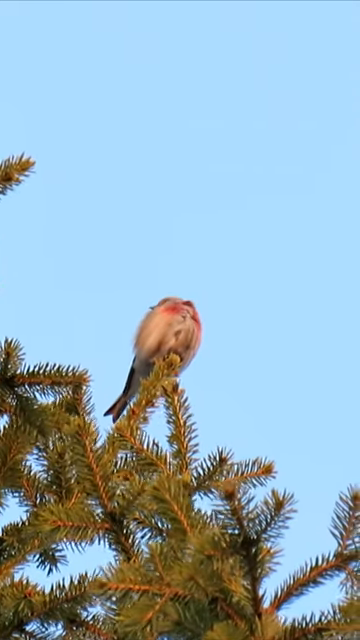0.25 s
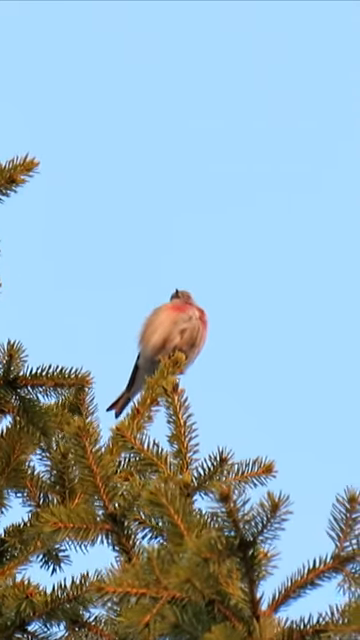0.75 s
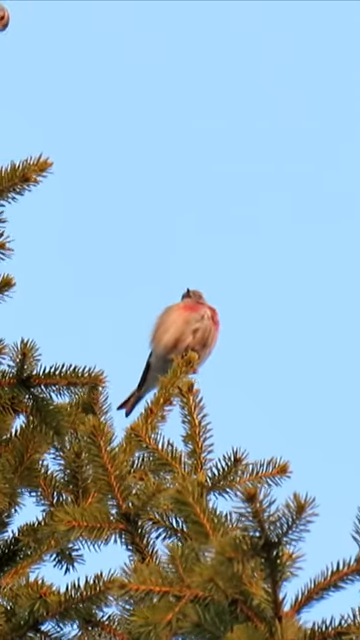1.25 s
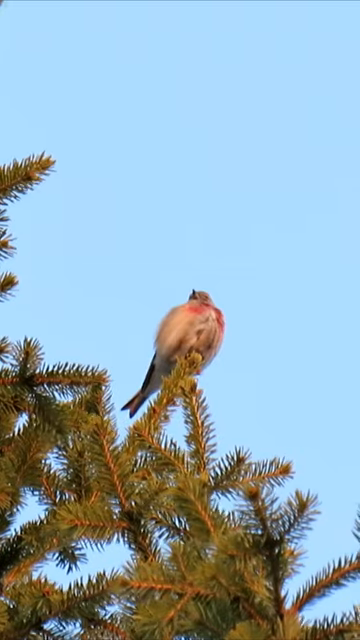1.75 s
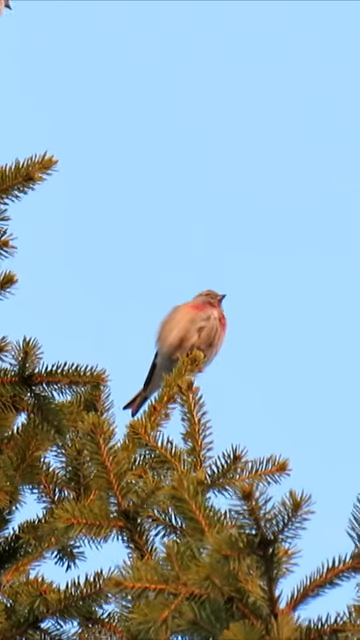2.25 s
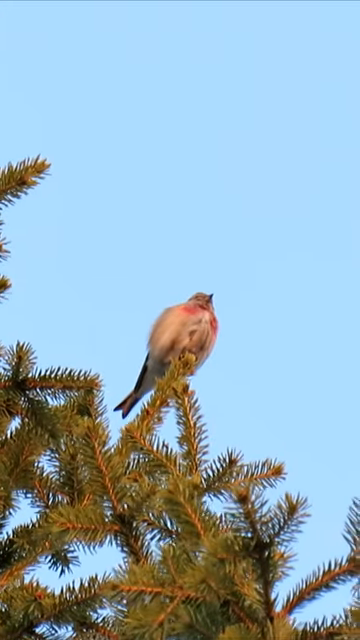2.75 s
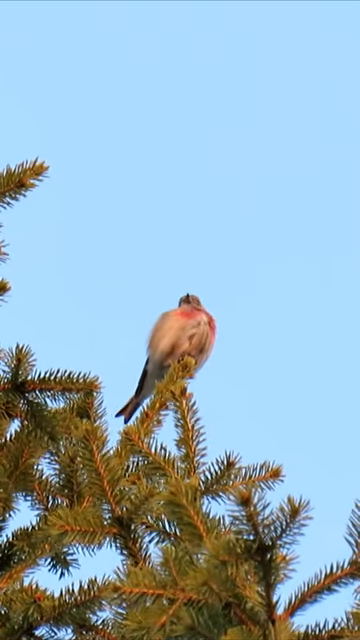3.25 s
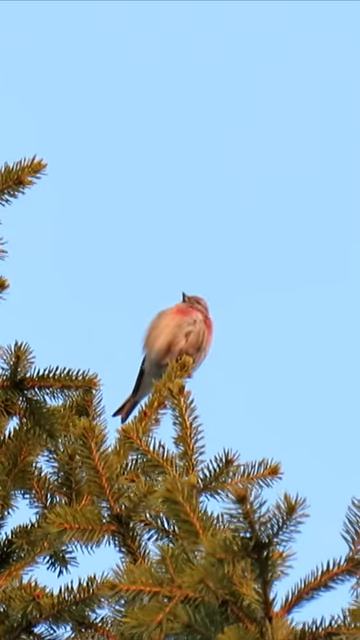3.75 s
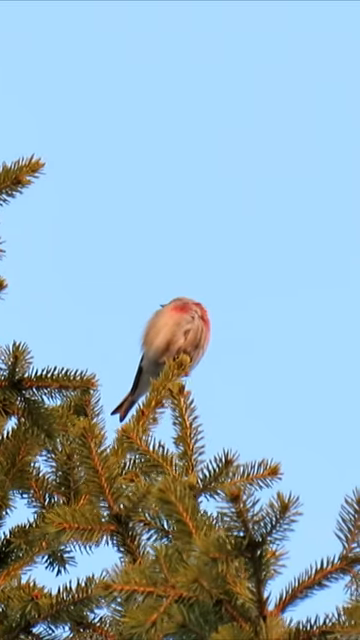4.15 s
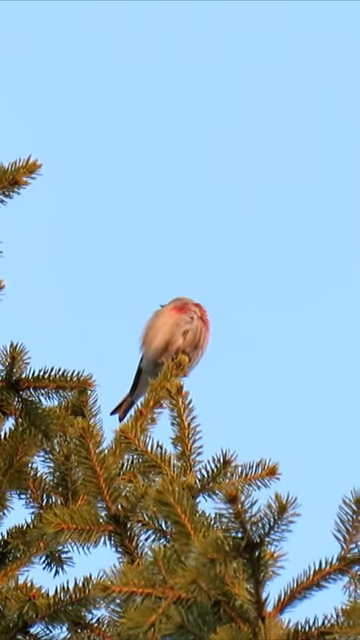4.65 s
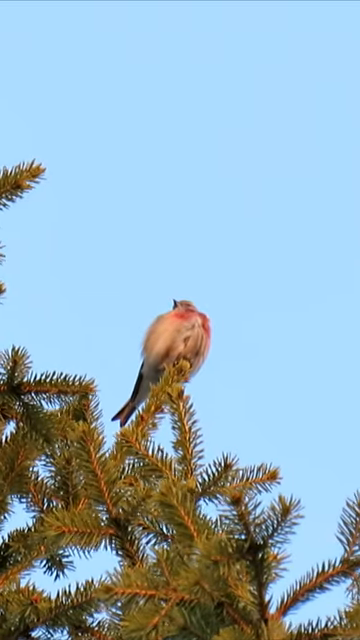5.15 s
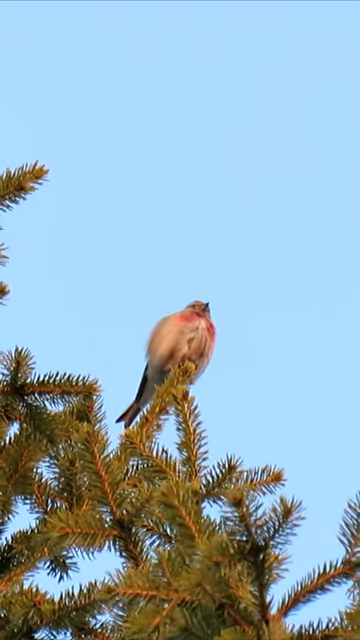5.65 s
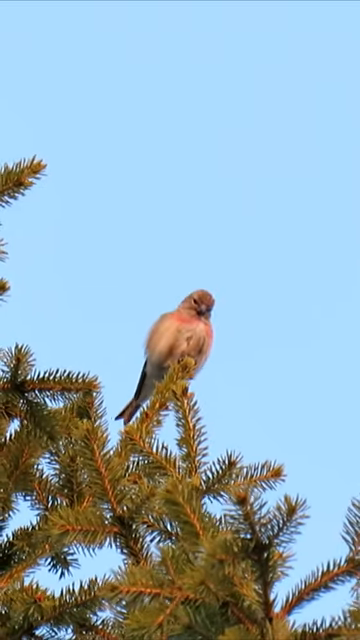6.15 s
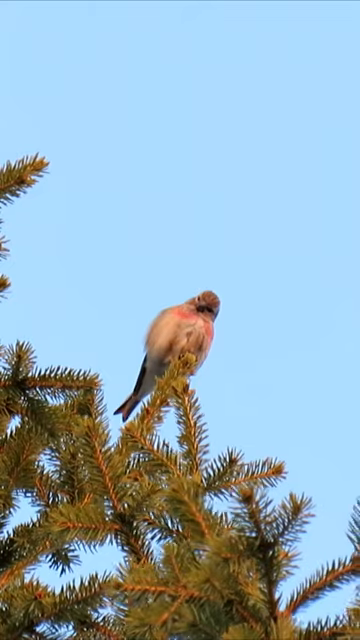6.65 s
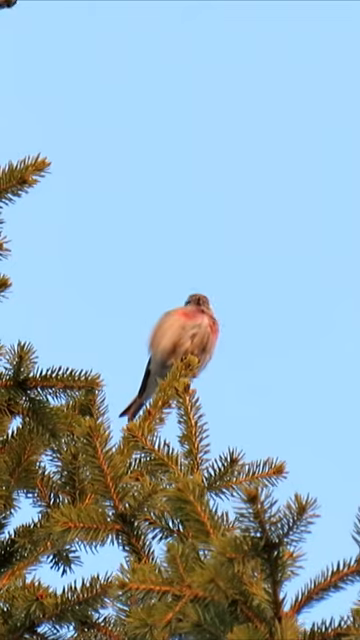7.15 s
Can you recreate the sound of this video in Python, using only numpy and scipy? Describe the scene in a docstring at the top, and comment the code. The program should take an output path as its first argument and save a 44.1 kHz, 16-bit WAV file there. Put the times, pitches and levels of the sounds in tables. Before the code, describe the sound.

Fast twittering, gliding whistles and reedy notes from one small bird outdoors, with a faint distant engine behind it.

```python
"""Sharp chips ring out over a soft outdoor rush: a linnet sings from the top of a spruce, going on to
whistles, buzzes, reedy arches and nasal notes. Source and filter: each note is one gliding tone of the
syrinx, its overtones shaped by throat and beak; twigs and trees scatter a faint echo.
Midway a far engine starts to drone and a few dry ticks begin; the rush swells at the end."""
import sys
import numpy as np
from scipy import signal
from scipy.fft import rfft, irfft, next_fast_len
from scipy.io import wavfile
from scipy.ndimage import uniform_filter1d, map_coordinates

SR = 44100
rng = np.random.default_rng(int(sys.argv[2]) if len(sys.argv) > 2 else 0)


def transcribe(u):
    """Save the signal u as a 16-bit wav file named by the first command-line argument.

    u: samples, shape (n,) or (channels, n), limited to [-1, 1]; the rate is SR.
    q: integer samples, one column per channel.
    """
    v = np.clip(np.atleast_2d(u).T, -1, 1)
    q = np.round(v * 32767).astype(np.int16)
    wavfile.write(sys.argv[1], SR, q)


N = 326781


def amp(db):
    return 10 ** (np.asarray(db) / 20)


def unit(x):
    return x / np.sqrt(np.mean(x ** 2) + 1e-20)


def along(points, hz):
    """Interpolation of (f/Hz, value) points on a logarithmic frequency axis."""
    f, v = np.transpose(points)
    return np.interp(np.log(np.abs(hz) + 1), np.log(f + 1), v)


def curves(rows, t):
    """Linear interpolation in time of each column after the first."""
    s, *cols = np.transpose(rows)
    return [np.interp(t, s, c) for c in cols]


def span(start, end):
    """Sample indices and times of an interval."""
    i = np.arange(max(int(start * SR), 0), min(int(end * SR), N))
    return i, i / SR


def wobble(rate, size):
    """Smooth random modulation: a spline through rate knots a second."""
    return map_coordinates(rng.standard_normal(int(size * rate / SR) + 4), [np.arange(size) * rate / SR])


def filtered(x, response):
    """Linear filtering: the spectrum is multiplied by a frequency response."""
    m = next_fast_len(N + SR // 2)
    return irfft(rfft(x, m) * response(np.fft.rfftfreq(m, 1 / SR)), m)[..., :N]


def gate(t, start, end, ramp):
    """A window with raised-cosine edges."""
    return np.sin(np.pi / 2 * np.clip(np.minimum(t - start, end - t) / ramp + .5, 0, 1)) ** 2


# Response of throat and beak: f/Hz, gain/dB
BEAK_RESPONSE = [(1500, -9.5), (2300, 0), (3300, 0.5), (6000, 0.5), (7500, -12), (10000, -15.5),
                 (15000, -28)]

def syrinx(hz, partials, jitter, shimmer_db):
    """Source and filter: partials of an unsteady tone slide through the pass band of throat and beak."""
    hz = hz * (1 + jitter * wobble(609, len(hz)))
    phase = 2 * np.pi * np.cumsum(hz) / SR
    tone = sum(amp(db + along(BEAK_RESPONSE, k * hz)) * np.sin(k * phase) * (k * hz < SR / 2)
               for k, db in partials)
    return tone * amp(shimmer_db * wobble(323.8, len(hz)))


def rasp(hz, depth):
    """Noise modulation: air rushing through the syrinx spreads sidebands around a tone."""
    return 1 + depth * wobble(3500, len(hz))


def chirp(apex, top_hz, rise, fall, sag, roundness, levels, doubling_db, edge, jitter, rasp_db):
    """Joint modulation: pitch and level arch together; period doubling adds half-order partials."""
    out = np.zeros(N)
    i, t = span(apex - 2 * rise, apex + 2 * fall)
    rising = t < apex
    u = np.abs((t - apex) / np.where(rising, rise, fall))  # distance from the apex
    bend = roundness * np.where(rising, 2, 1) + rising + 1e-3  # the climb starts steeply and rounds off
    drop = np.where(rising, .33, sag)
    hz = top_hz * (1 - drop * u * u * (1 + bend) / (u * u + bend))
    envelope = np.exp(-edge * u ** np.where(rising, 2.6, 3))
    # roughness and period doubling are strongest early in the climb
    roughness = amp(rasp_db) + amp(-16) * u * rising
    half_order_db = doubling_db - 7 * (1 - np.minimum(u, 1) * rising)
    partials = list(enumerate(levels, 1)) + [(1.5, half_order_db), (2.5, half_order_db)]
    out[i] = envelope * rasp(hz, roughness) * syrinx(hz, partials, jitter, shimmer_db=1.1)
    return out


# Sharp chips: apex t/s, top f/Hz, fall time/s, share of pitch lost, level/dB, octave lift/dB
CHIPS = [(0.0, 2250, 0.025, 0.25, -40, -9.5), (0.1246, 2270, 0.023, .18, -45.5, -2.5),
         (0.243, 2450, 0.023, 0.22, -49.5, -1.5), (0.39, 2440, .024, 0.26, -52, -2.5),
         (0.5945, 2324, 0.0093, 0.21, -41.5, -0.5), (0.733, 2470, 0.015, 0.37, -40, 0.5),
         (0.8855, 2630, 0.019, 0.42, -34.5, 5), (1.068, 2480, 0.012, 0.34, -34.5, 8.5),
         (1.2153, 2950, 0.028, 0.19, -38, -11), (1.783, 2515, 0.019, .35, -34, 5),
         (1.908, 2690, 0.026, 0.28, -35.5, 5), (2.157, 2840, 0.011, 0.14, -37.5, 11),
         (2.3111, 2960, 0.021, 0.2, -38, 15), (2.4344, 2066, 0.012, 0.21, -36, 15.5),
         (2.5618, 2333, 0.013, .28, -36, 12), (2.669, 2220, 0.014, .26, -36, 8.5),
         (6.1992, 2440, 0.014, .28, -36.5, 1), (6.408, 3120, .024, 0.33, -28.5, -4.5),
         (6.513, 2407, 0.018, .35, -28.5, 2.5), (7.153, 2660, 0.017, 0.35, -40, 1),
         (7.213, 2786, 0.017, .42, -39.5, 0.5), (7.274, 2630, 0.012, 0.33, -38, 2),
         (7.339, 2766, 0.015, 0.33, -40.5, 3.5), (7.4093, 2710, .01, 0.25, -41.5, 3)]

def chips():
    """Frequency sweep: a flick up and a slide down, the higher overtones in step with the octave."""
    out = np.zeros(N)
    for apex, top_hz, fall, sag, db, lift_db in CHIPS:
        octave_db = db + lift_db
        levels = [db - 1.5, octave_db, octave_db - 14, octave_db - 22, octave_db - 30]
        out += chirp(apex, top_hz, rise=.008, fall=fall, sag=sag, roundness=.13, levels=levels,
                     doubling_db=octave_db - 22, edge=1.78, jitter=.012, rasp_db=-26.5)
    return out


def twigs(x, t60=.04):
    """Early reflections: branches close to the bird smear each note a little."""
    t = np.arange(SR // 10) / SR
    tail = rng.standard_normal(len(t)) * amp(-60 * t / t60)
    return signal.fftconvolve(x, tail / np.linalg.norm(tail))[:N]


# Reverberation time of the trees: f/Hz, T60/s
TREE_DECAY = [(1500, 0.29), (4000, 0.11), (10000, 0.22)]

def tree_echo(x, delay_s=.0074):
    """Reverberation: scatter from the trees leaves a thin tail that dies fastest near 4 kHz."""
    hz, t, spectra = signal.stft(rng.standard_normal(SR // 2), SR, nperseg=256)
    decay = amp(-60 * t / along(TREE_DECAY, hz)[:, None])
    tail = signal.istft(spectra * decay, SR, nperseg=256)[1]
    response = np.pad(tail / np.linalg.norm(tail), (int(delay_s * SR), 0))
    return signal.fftconvolve(x, response)[:N]


# Likeness of left and right in the background: f/Hz, correlation
COHERENCE = [(60, 0.98), (130, 0.93), (290, 0.54), (640, 0.96), (1410, 0.96), (3100, 0.93), (6820, 1),
             (15000, 0.99)]

def air(spectrum, patchy_db):
    """Partial coherence: coloured stereo noise of rms 1, its gain patchy in time and frequency."""
    spectra = signal.stft(rng.standard_normal((2, N)), nperseg=512)[2]
    patches = uniform_filter1d(rng.standard_normal(spectra.shape[1:]), size=5, axis=0)
    patches = uniform_filter1d(patches, size=16, axis=1)
    pair = signal.istft(spectra * amp(patchy_db * unit(patches)), nperseg=512)[1][:, :N]

    def mid_side_response(hz):
        angle = np.arccos(np.clip(along(COHERENCE, hz), -1, 1)) / 2
        return amp(along(spectrum, hz)) * [np.cos(angle), np.sin(angle)]

    mid, side = filtered(pair, mid_side_response)
    return unit(np.array([mid + side, mid - side]))


# Envelopes of the background: t/s, level/dB
RUSH_LEVEL = [(0.0, -53.5), (0.1, -53), (1.53, -56), (2.15, -52.5), (2.77, -57), (4.31, -52.5), (6.31, -54),
              (7.08, -47), (7.41, -46)]
HISS_LEVEL = [(0, -63), (.41, -70), (.44, -76), (.56, -75), (.58, -63.5), (7.41, -63.5)]
# Spectral densities of the background: f/Hz, relative level/dB
RUSH_SPECTRUM = [(150, -11), (300, -1.5), (450, 0.5), (700, -1), (1150, 2), (1600, -3.5), (2200, -9),
                 (3500, -16), (9000, -69.5)]
HISS_SPECTRUM = [(900, -27), (1800, 4.5), (3000, 0.5), (5000, 5.5), (8000, -3.5), (11000, -6), (15800, -27)]
RUMBLE_SPECTRUM = [(15, -23), (30, 2.5), (42, 1), (62, 4.5), (100, -1.5), (155, 3), (190, -1.5), (228, 5),
                   (270, -3), (500, -27.5)]

def outdoors(rumble_db=-59):
    """Incoherent sum of noises: a distant rush, a fine hiss that dips briefly and a low rumble."""
    t = np.arange(N) / SR
    rush = amp(curves(RUSH_LEVEL, t)[0]) * air(RUSH_SPECTRUM, patchy_db=1.5)
    hiss = amp(curves(HISS_LEVEL, t)[0]) * air(HISS_SPECTRUM, patchy_db=.7)
    rumble = amp(rumble_db) * air(RUMBLE_SPECTRUM, patchy_db=-2)
    return rush + hiss + rumble


def whistled(hz, harmonics, jitter, shimmer_db):
    """Sustained oscillation of the syrinx, with a trace of air noise."""
    return syrinx(hz, harmonics, jitter, shimmer_db) * rasp(hz, amp(-33))


def held_notes(notes, harmonics, jitter, shimmer_db, swell_db=14, firm_db=-36, ramp=.0034):
    """Glide and sustain: a note swells onto its pitch, then drifts; weakly blown ones waver more."""
    out = np.zeros(N)
    for start, length, glide, first_hz, held_hz, last_hz, held_db, fade_db in notes:
        i, t = span(start - ramp, start + length + ramp)
        approach = np.clip(1 - (t - start) / glide, 0, 1)
        drift = np.interp(t, [start + glide, start + length], [0, 1])
        hz = held_hz + (first_hz - held_hz) * approach ** 1.6 + (last_hz - held_hz) * drift
        db = held_db - swell_db * approach ** 2.7 - fade_db * drift
        waver = .5 + .081 * np.maximum(firm_db - db, 0)
        tone = whistled(hz, harmonics, jitter * waver, shimmer_db * waver)
        out[i] += amp(db) * gate(t, start, start + length, ramp) * tone
    return out


# Pure whistles: t/s, length/s, glide time/s, first f/Hz, held f/Hz, last f/Hz, level/dB, fade/dB
WHISTLES = [(0.625, 0.097, 0.043, 5100, 5370, 5250, -48, -3),
            (0.72, 0.072, 0.044, 5380, 5440, 5360, -48.5, -4),
            (0.781, 0.069, .022, 5450, 4650, 3540, -44, 20), (0.93, 0.1, 0.051, 2650, 2620, 2500, -61, -3),
            (1.204, 0.0143, 0.012, 3210, 3470, 3080, -31.5, 11),
            (1.42, .24, 0.18, 4300, 4400, 4360, -53.5, 16), (1.4954, 0.16, 0.056, 3080, 3305, 3377, -28, 4),
            (1.829, 0.078, 0.047, 4614, 3970, 3500, -53.5, -5),
            (2.731, 0.14, 0.072, 4120, 3304, 3375, -30, 20),
            (2.875, 0.14, 0.052, 3250, 2440, 2430, -50.5, 5.5),
            (3.028, 0.01, 0.0035, 4900, 4800, 3980, -53, 9), (4.56, 0.043, 0.02, 3550, 3150, 2300, -32, 6),
            (4.749, 0.031, .012, 3100, 2820, 2390, -35.5, 3),
            (5.631, 0.039, 0.0035, 5400, 5270, 4270, -43, 11),
            (5.77, 0.12, 0.037, 3980, 3910, 4050, -46, 0), (5.895, 0.058, 0.049, 4150, 3250, 2840, -36, 17),
            (5.95, 0.18, 0.014, 3020, 2980, 3230, -50, 8), (6.065, 0.22, .016, 6750, 4370, 4460, -41.5, 14),
            (6.07, 0.23, 0.055, 2220, 2204, 2350, -54, 10), (6.27, .12, .06, 2350, 2560, 2950, -59.5, -6),
            (6.752, 0.31, 0.038, 3450, 3003, 2940, -40, 19),
            (6.932, 0.035, 0.023, 5560, 5420, 7060, -47, 1)]
# Their source spectrum: harmonic number, relative level/dB
WHISTLE_HARMONICS = [(1, 0.5), (2, -25.5), (3, -28.5)]

def whistles():
    """Nearly sinusoidal oscillation: either side of the syrinx sounds a tone with faint overtones."""
    return held_notes(WHISTLES, WHISTLE_HARMONICS, jitter=.0049, shimmer_db=1.1)


# Loud hooked whistles: t/s, length/s, f/Hz after the dive, last f/Hz,
# overshoot and quiver as shares of pitch, level/dB, fade/dB
HOOKS = [(1.185, 0.0195, 3810, 3310, 0, 0, -21.5, 15), (4.4834, 0.069, 3906, 3364, .02, 0.016, -15.5, 21),
         (4.6536, 0.067, 3634, 3500, .02, 0.064, -16, 23),
         (5.181, 0.055, 4140, 6300, 0.089, 0.012, -25, 3.1), (5.296, .061, 4135, 5610, 0.11, .01, -23, 3.7),
         (5.4216, 0.055, 4305, 6200, 0.138, 0.0033, -17, 22.7),
         (5.5456, 0.051, 4240, 4800, 0.23, 0.015, -24, 26)]
# Their source spectrum: harmonic number, relative level/dB
HOOK_HARMONICS = [(1, 1.5), (2, -27.5), (3, -37)]

def hooks(dive_from_hz=5760, dive_s=.0068, rebound_hz=81.6, rebound_decay_s=.0048, ramp=.0034):
    """Damped oscillation of pitch: it dives, rebounds like a spring, then bends as the note fades."""
    out = np.zeros(N)
    for start, length, held_hz, last_hz, overshoot, quiver, db, fade_db in HOOKS:
        i, t = span(start - ramp, start + length + ramp)
        dive = np.clip(1 - (t - start) / dive_s, 0, 1)
        after = np.maximum(t - start - dive_s, 0)
        progress = after / (length - dive_s)
        depth = quiver + overshoot * np.exp(-after / rebound_decay_s)
        spring = depth * np.cos(2 * np.pi * rebound_hz * after)
        hz = (held_hz + (last_hz - held_hz) * progress ** 1.4) * (1 - spring)
        hz = hz + (dive_from_hz - hz) * dive
        envelope = amp(db - 10 * dive ** 2 - fade_db * progress ** 2.63)
        tone = whistled(hz, HOOK_HARMONICS, jitter=.011, shimmer_db=1.6)
        out[i] += envelope * gate(t, start, start + length, ramp) * tone
    return out


def zigzag(rate, size):
    """A triangular modulator with rounded tips and a slightly uneven pace."""
    phase = 2 * np.pi * np.cumsum(rate * (1 + .017 * wobble(80, size))) / SR
    return 2 / np.pi * np.arcsin(-.97 * np.cos(phase))


# Pulsed whistles: start t/s, end t/s, first f/Hz, last f/Hz, pulse rate/Hz, swing as share of pitch,
# level/dB, octave lift/dB, pulsing/dB
TREMOLOS = [(1.2875, 1.324, 4280, 3820, 145, 0.05, -23, -24, 3),
            (1.334, 1.49, 2914, 2930, 80, 0.029, -47, -11.5, 7.5),
            (6.285, 6.397, 5540, 4360, 59, -0.033, -47, -30, 17),
            (6.434, 6.605, 3911, 3990, 55, .005, -53.5, -30, 15.5)]

def tremolos(swell_db=18, swell_s=.014, ramp=.0017):
    """Amplitude modulation: a sliding whistle breaks into quick pulses, each with a slight pitch swing."""
    out = np.zeros(N)
    for start, end, first_hz, last_hz, rate, depth, db, octave_db, pulse_db in TREMOLOS:
        i, t = span(start, end)
        swing = zigzag(rate, len(t))
        hz = np.linspace(first_hz, last_hz, len(t)) * (1 + depth * swing)
        level_db = db + pulse_db * swing - swell_db * np.maximum(1 - (t - start) / swell_s, 0)
        tone = whistled(hz, [(1, 0), (2, octave_db), (3, octave_db - 13)], jitter=.031, shimmer_db=4.1)
        out[i] += amp(level_db) * gate(t, start + ramp / 2, end - ramp / 2, ramp) * tone
    return out


# Zigzag buzzes: start t/s, end t/s, centre f/Hz, swing rate/Hz, swing as share of pitch,
# level/dB, octave lift/dB, pulsing/dB, roughness (0-1)
BUZZES = [(2.0784, 2.158, 2933, 87, 0.33, -27.5, 1.5, 7, 0.17),
          (2.25, 2.309, 2890, 86, 0.31, -26.5, 6, 6, 0.1),
          (3.145, 3.234, 3570, 146, 0.09, -56.5, -21, -5, 0.1),
          (5.711, 5.878, 2360, 58.2, 0.17, -35.5, -9, -2, 0.5),
          (6.662, 6.738, 3580, 105, 0.2, -41, -33, -5.5, 0.1)]

def buzzes(swell_db=13, swell_share=.55, flicker_db=.26, ramp=.0045):
    """Frequency modulation: pitch swings widely and unevenly; the swelling level pulses with it."""
    out = np.zeros(N)
    for start, end, centre_hz, rate, depth, db, octave_db, pulse_db, roughness in BUZZES:
        i, t = span(start, end)
        swing = zigzag(rate, len(t))
        hz = centre_hz * (1 + depth * swing * (1 + .07 * wobble(rate, len(t))))
        approach = np.maximum(1 - (t - start) / (swell_share * (end - start)), 0)
        level_db = db + pulse_db * swing - swell_db * approach + flicker_db * wobble(rate, len(t))
        tone = syrinx(hz, [(1, 0), (2, octave_db), (3, octave_db - 15)], jitter=.028, shimmer_db=2)
        envelope = amp(level_db) * gate(t, start + ramp / 2, end - ramp / 2, ramp)
        out[i] += envelope * tone * rasp(hz, roughness)
    return out


# Course of the engine's drone: t/s, firing f/Hz, relative level/dB
ENGINE_FIRING = [(3.2, 45.04, -66), (3.74, 50.55, -63.5), (6.56, 49, -61.5), (6.67, 47.52, -58),
                 (6.96, 54.6, -60), (7.41, 53, -66)]
# Its spectrum: harmonic number, relative level/dB
ENGINE_HARMONICS = [(1, 1.5), (2, -23), (3, -11.5)]
# Course of its whine: t/s, f/Hz, level/dB
ENGINE_WHINE = [(3.2, 470, -61), (3.35, 484.5, -59), (3.9, 532, -60), (4.55, 524, -62), (4.9, 470.5, -62.5),
                (5.8, 441.3, -63), (7.41, 468.8, -57.5)]

def engine(drone_gain_db=3, fade_in_s=.17):
    """Periodic excitation: a far engine drones on harmonics of its firing rate, under a wavering whine."""
    t = np.arange(N) / SR
    firing_hz, db = curves(ENGINE_FIRING, t)
    phase = 2 * np.pi * np.cumsum(firing_hz * (1 + .014 * wobble(30, N))) / SR
    tone = sum(amp(level) * np.sin(k * phase) for k, level in ENGINE_HARMONICS)
    drone = amp(db + drone_gain_db + 2.4 * wobble(17, N)) * tone
    whine_hz, whine_db = curves(ENGINE_WHINE, t)
    whine_phase = 2 * np.pi * np.cumsum(whine_hz * (1 + .026 * wobble(90, N))) / SR
    whine = amp(whine_db + 2.4 * wobble(23, N)) * np.sin(whine_phase)
    fade_in = np.clip((t - ENGINE_FIRING[0][0]) / fade_in_s + .5, 0, 1)
    return (drone + whine) * fade_in


# Faint dry ticks: t/s, level/dB before filtering
TICKS = [(3.218, -38.5), (3.806, -38.5), (7.075, -34), (7.277, -32)]

def ticks(gain_db=-10, t60=.035):
    """Heavily damped transients: short noise bursts in a band near 1.1 kHz knock without ringing."""
    bursts = np.zeros(N)
    for start, db in TICKS:
        i, t = span(start, start + .1)
        bursts[i] += amp(db - 60 * (t - start) / t60) * rng.standard_normal(len(t))
    band = [(300, -38), (1100, 26.5), (1700, 15.5), (3000, -21)]  # f/Hz, gain/dB
    return amp(gain_db) * filtered(bursts, lambda hz: amp(along(band, hz)))


# Reedy arches: apex t/s, top f/Hz, length/s, octave level/dB, brightness/dB, period doubling/dB
ARCHES = [(3.3512, 3164, .047, -30, -1, -14), (3.5069, 2905, .038, -27.5, 2, -24),
          (3.6572, 3065, .051, -30.5, -2, -23), (3.8134, 2955, .039, -29, 0, -30),
          (3.9346, 2825, .048, -25, 0, -16), (4.0694, 2630, .035, -32, 1, -14),
          (4.233, 2750, .031, -29.5, 3, -5), (4.3596, 2680, .039, -27, 2, -2),
          (4.829, 2576, .037, -26.5, -15, -20), (4.9235, 2560, .036, -32.5, -6, -25),
          (5.0403, 2504, .037, -33, -7, -19), (5.133, 2445, .033, -31, -4, -30),
          (5.218, 2440, .04, -29, -9, -25), (5.3094, 2624, .033, -33, -11, -7),
          (5.4297, 2526, .035, -35, -7, -15), (5.5285, 2550, .028, -31.5, -11, -25),
          (5.6102, 2380, .033, -31, -5, -13)]

def arches():
    """Timbre from harmonic balance: a rounded sweep sounds reedy as its octave outweighs the fundamental."""
    out = np.zeros(N)
    for apex, top_hz, length, db, bright_db, doubling_db in ARCHES:
        third_db = db + bright_db
        levels = [db - 7, db, third_db, third_db - 12, third_db - 20]
        out += chirp(apex, top_hz, rise=length / 2, fall=length / 2, sag=.26, roundness=.612,
                     levels=levels, doubling_db=db + doubling_db, edge=1.66, jitter=.014, rasp_db=-20.5)
    return out


# Low nasal notes: t/s, length/s, glide time/s, first f/Hz, held f/Hz, last f/Hz, level/dB, fade/dB
NASALS = [(4.18, 0.059, 0.068, 1223, 1476, 1510, -40.5, 3), (4.29, .275, 0.03, 1132, 1404, 1495, -37, 7),
          (4.889, 0.15, .018, 1520, 1536, 1666, -33, 35)]
# Their source spectrum: harmonic number, relative level/dB
NASAL_HARMONICS = [(1, -3.5), (2, -7.5), (3, 1), (4, -10.5), (5, -26)]

def nasals():
    """Weak fundamental: it lies below the pass band of the beak, and the third harmonic leads."""
    return held_notes(NASALS, NASAL_HARMONICS, jitter=.0017, shimmer_db=2.5)


def scene():
    """Superposition: the bird straight ahead, alike in both channels, with echoes and background."""
    song = chips() + arches() + hooks() + buzzes() + tremolos() + whistles() + nasals()
    radiation = [(800, -40), (1600, 0)]  # a small beak radiates low notes poorly: f/Hz, gain/dB
    song = filtered(song, lambda hz: amp(along(radiation, hz)))
    return song + amp(-16) * twigs(song) + amp(-18.5) * tree_echo(song) + engine() + ticks() + outdoors()


def record(dry, ceiling=.5, band_limit_hz=15850):
    """Soft saturation and band limiting: the microphone rounds the peaks and cuts the highest treble."""
    rounded = dry / np.sqrt(1 + (dry / ceiling) ** 2)
    return filtered(rounded, lambda hz: hz < band_limit_hz)


dry = scene()
out = record(dry)
transcribe(out)
```